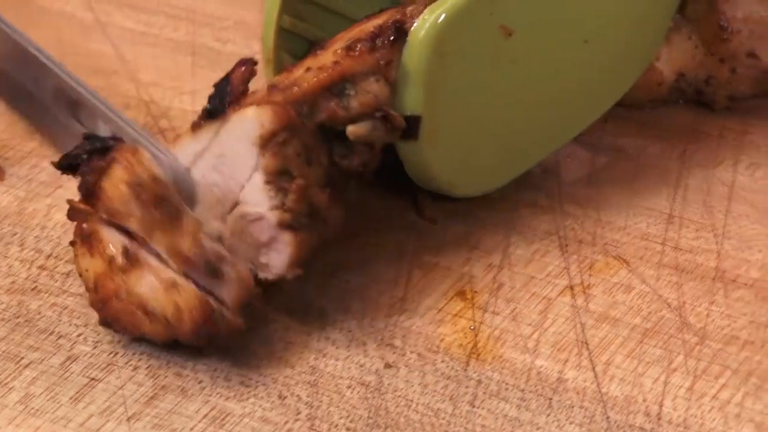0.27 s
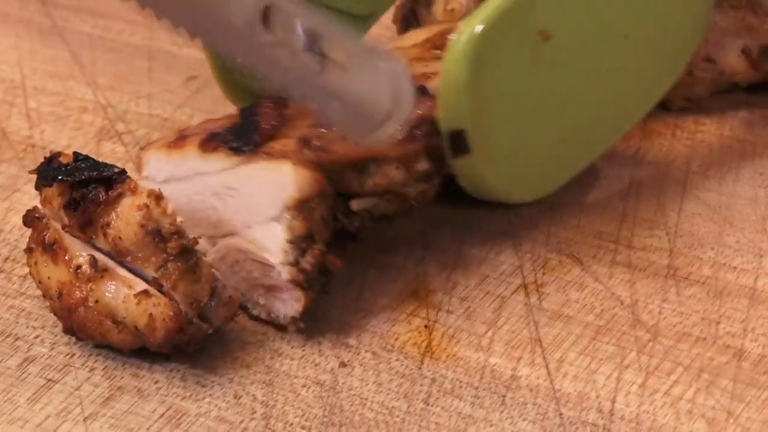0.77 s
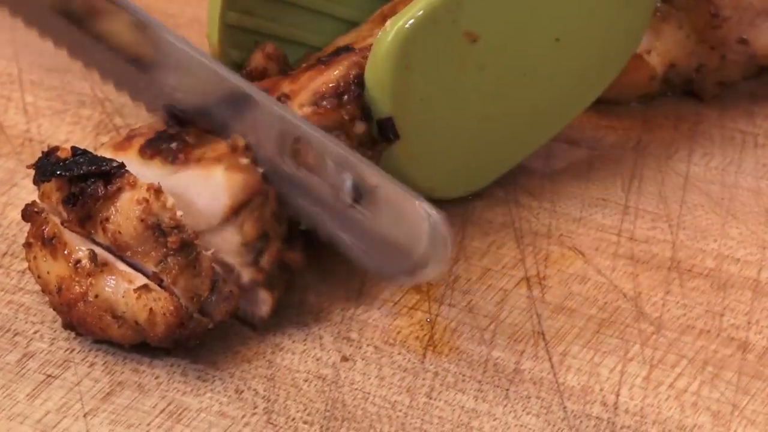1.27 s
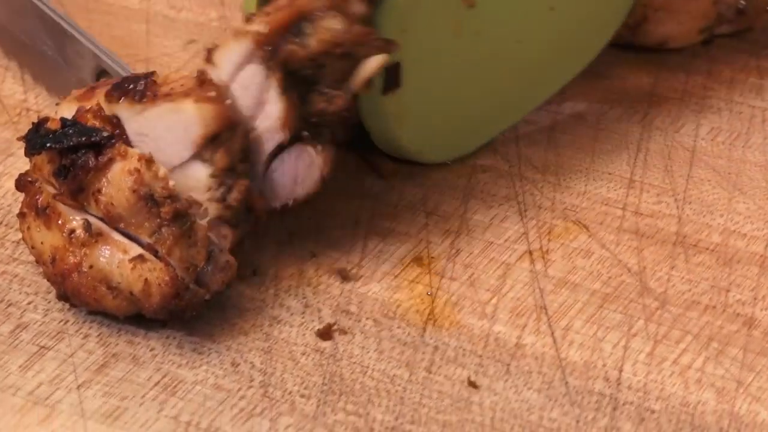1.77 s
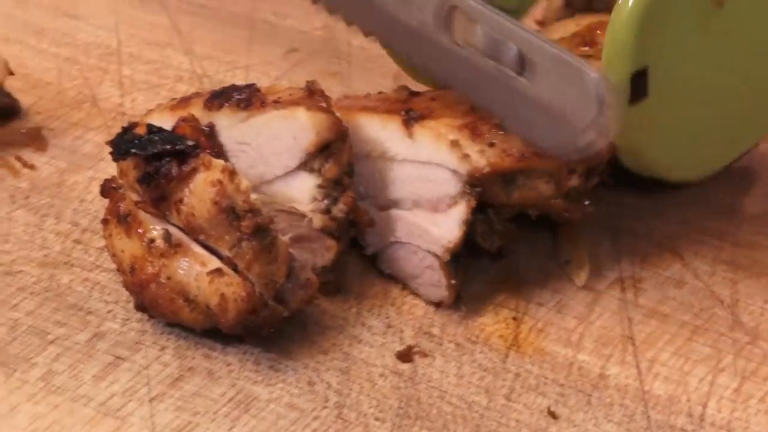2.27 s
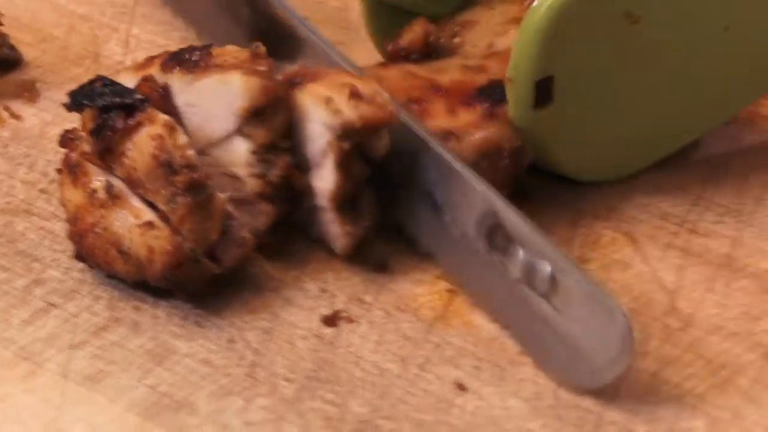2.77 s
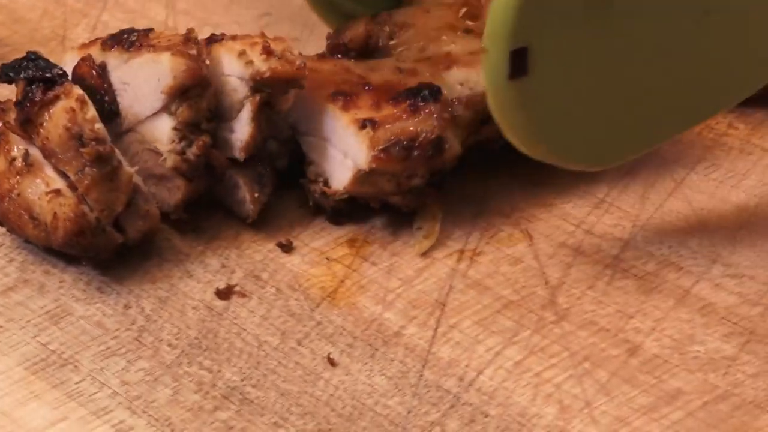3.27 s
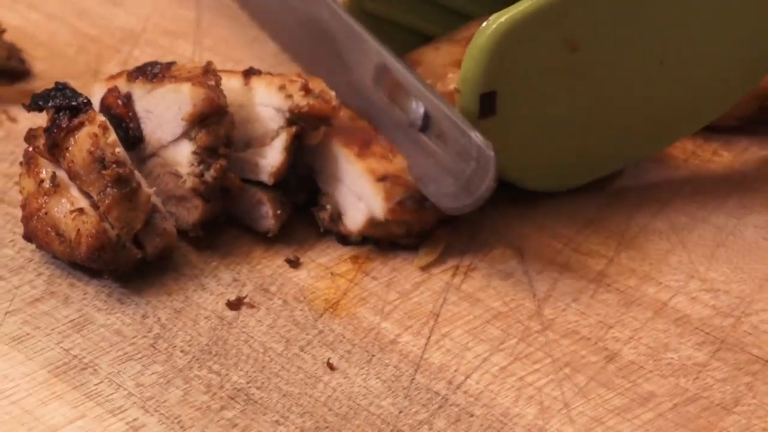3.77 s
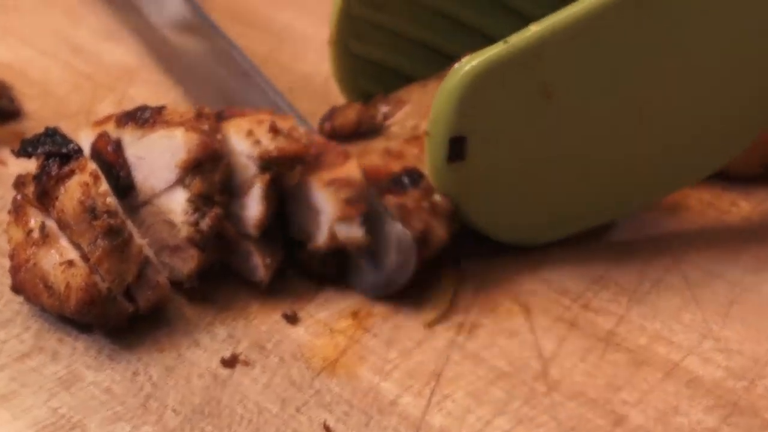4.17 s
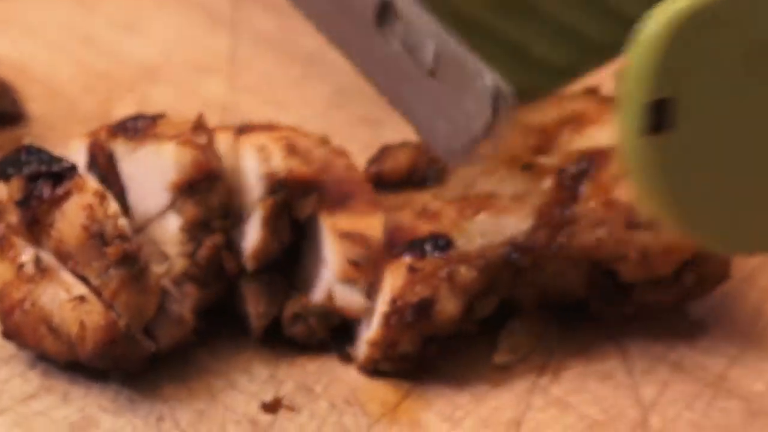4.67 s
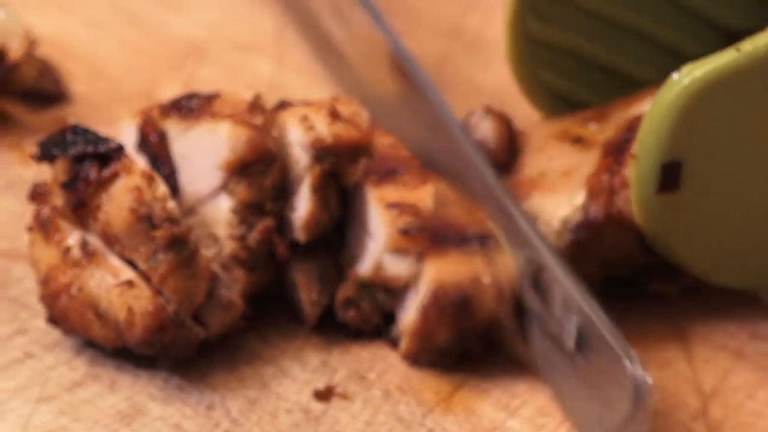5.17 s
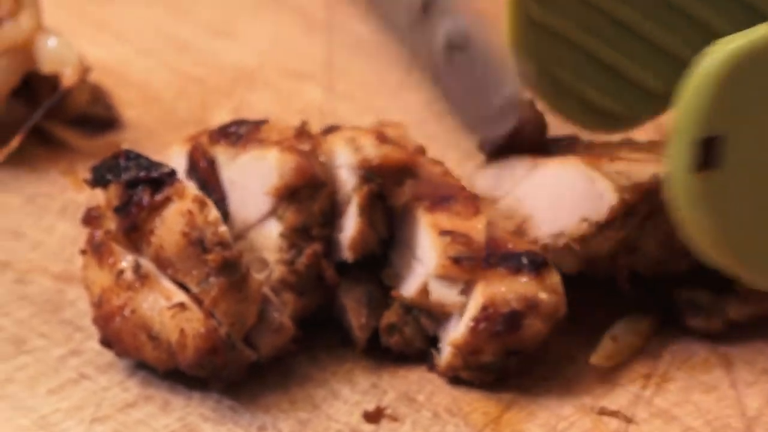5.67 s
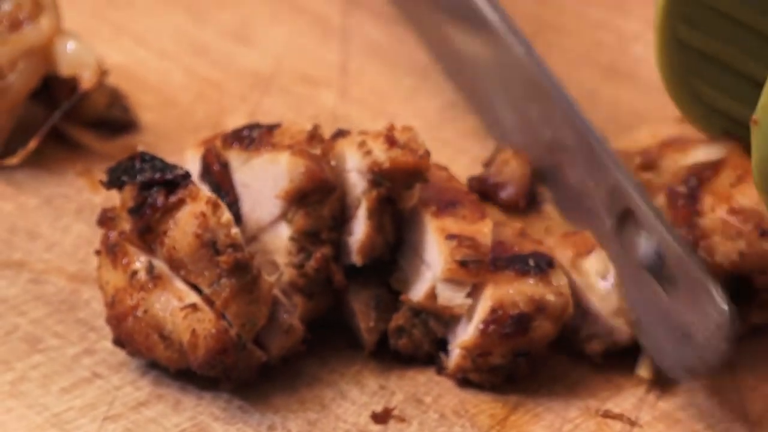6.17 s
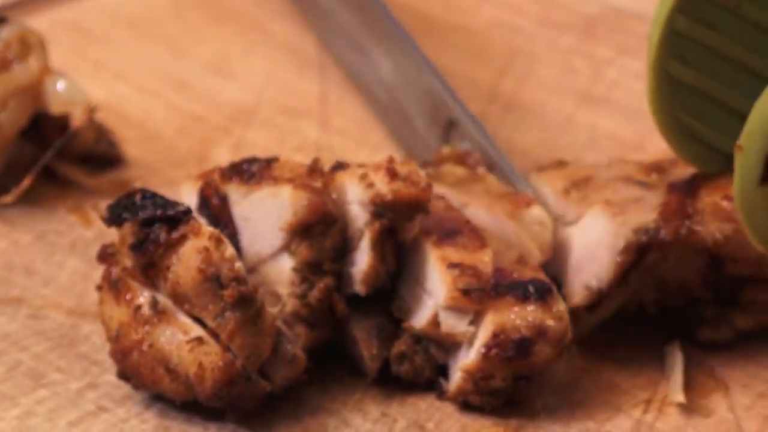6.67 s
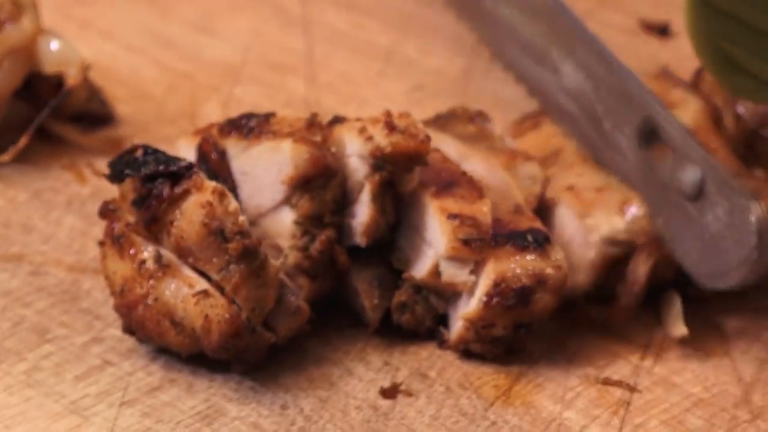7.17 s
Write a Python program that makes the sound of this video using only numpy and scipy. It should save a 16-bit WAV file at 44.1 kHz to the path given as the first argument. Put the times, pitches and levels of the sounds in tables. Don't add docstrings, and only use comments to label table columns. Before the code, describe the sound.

Close, dry, harsh motor buzz and metallic blade chatter, repeatedly sagging into a tighter, muffled whine as the knife bites into meat, then springing back.

```python
import sys
import numpy as np
from scipy import signal
from scipy.fft import rfft, irfft
from scipy.io import wavfile
from scipy.ndimage import uniform_filter1d

SR = 44100
rng = np.random.default_rng(int(sys.argv[2]) if len(sys.argv) > 2 else 0)


def invert_db(level):
    return 10 ** (np.asarray(level, dtype=float) / 20)


def int16_out(signal):
    q = np.round(np.clip(np.atleast_2d(signal).T, -1, 1) * 32767)
    wavfile.write(sys.argv[1], SR, q.astype(np.int16))


N = 327222

WHINE_PER_STROKE = np.array([21 / 2, 21, 84])
# (start [s], full [s], end [s], speed lost [strokes/s])
DRAG = [
    (-.594, .088, .361, 2.682),
    (.73, .732, .857, 11.191),
    (1.235, 1.727, 1.958, 3.062),
    (2.565, 3.115, 3.155, 3.57),
    (3.802, 4.054, 4.436, 2.79),
    (5.12, 5.512, 5.656, 3.425),
    (6.205, 6.76, 6.742, 4.891),
    (6.916, 8.904, 9, 2.476),
]
# (blades touch [s], sunk [s], come out [s], depth [0-1])
CUTS = [
    (-.4, -.2, .38, .8),
    (1.36, 1.48, 1.93, .76),
    (2.68, 2.92, 3.165, .8),
    (3.86, 3.98, 4.36, .8),
    (5.15, 5.24, 5.63, .52),
    (5.37, 5.47, 5.63, .42),
    (6.2, 6.52, 6.745, .86),
    (7.33, 7.55, 7.9, .9),
]
# (start [s], end [s], level on twice the rotor [dB])
STRAIN = [
    (-.1, .33, 2.5),
    (1.45, 1.93, 1),
    (2.8, 3.1, 2),
    (6.3, 6.75, 1),
]
# (start [s], end [s], level [dB])
COMMUTATOR = [(.2, .5, -49), (1.17, 1.65, -44), (1.68, 1.96, -46), (2.0, 2.2, -48), (2.2, 2.47, -44),
              (2.54, 2.97, -41.5), (3.12, 3.33, -47), (3.5, 3.75, -47), (3.84, 4.2, -41), (4.8, 5.1, -45),
              (4.95, 5.29, -40.5), (5.15, 5.52, -46), (5.95, 6.62, -41), (7.03, 7.5, -42)]
# (multiple of the stroke [1], level [dB])
HOUSING = [(13, -9), (14, -1.5), (15, -13), (16, -5.5), (18, -3.5), (20, -11), (23, -11), (26, -15),
           (27, -8), (28, -12), (29, -10), (31, -14), (34, -14)]
# (time [s], hum level [dB], more on high multiples [dB])
HOUSING_TURN = [(0, -3, -2), (.6, 0, 2), (1.0, -0.5, 3.5), (1.3, -1.5, 2.5), (1.95, -4, 3), (2.15, -1, 5),
                (2.45, -0.6, 1), (3.15, -7.5, -1), (3.4, 1, 3), (3.7, 0.5, -1), (4.4, -3, 2), (4.62, 2, -1),
                (4.85, 2, -2.5), (5.15, -4, -0.5), (5.8, -1, 1.5), (6.2, -4.5, 1), (6.9, -1.5, 0.5),
                (7.42, -3.5, 3.5)]
# (place in stroke [0-1], middle [dB], presence [dB], treble [dB], spray length [ratio])
FREE_CONTACTS = [(.245, -4.5, -1.5, 0, 1.1), (.42, -1, -.5, -.5, 1.4), (.735, -3.5, -5, -2.5, 1.2),
                 (.915, 0, -1.5, 0, 1.2)]
LOADED_CONTACTS = [(.18, 0, 0, 0, 1.1), (.44, -8, -9, -12, 3), (.695, -1, -4.5, -8, .9),
                   (.91, -10, -10, -6, 1.6)]
# (middle [dB], presence [dB], treble [dB])
FREE_BETWEEN = [-10, -13, -18]
# (frequency [Hz], density [dB per Hz])
FREE_COLOUR = [(15, -93), (25, -55), (50, -26.5), (175, -10.5), (426, -7), (474, -7), (528, -6), (621, -3),
               (1100, -4.5), (2210, -6), (2820, -9), (4000, -6), (6870, -6), (7860, -8.5), (12400, -10),
               (15900, -13.5)]
LOADED_COLOUR = [(15, -78), (25, -42.5), (403, -13.5), (462, -15), (771, -3.5), (907, -6), (1220, -8),
                 (1560, -7), (2980, -17.5), (3590, -7.5), (4110, -10.5), (6170, -10), (8080, -21.5),
                 (10000, -16.5), (15900, -23)]
# (frequency [Hz], width [Hz], level [dB])
FREE_PEAKS = [(850, 73, 5), (2690, 91, 1.5), (5400, 260, 2.5), (7840, 410, -9), (9600, 730, 0.5),
              (12600, 900, 1.2)]
LOADED_PEAKS = [(1328, 200, 5.6), (1960, 270, 6), (5570, 370, 0.93), (9340, 980, 4.6)]
# (start [s], end [s], level [dB])
TICKING = [
    (1.142, 1.46, 18),
    (2.55, 2.85, 15.5),
    (3.75, 3.95, 11),
    (5.05, 5.3, 15.5),
    (6.1, 6.35, 18),
    (7.22, 7.5, 7),
]
BAND_EDGES = [450, 4400, 7600]
# (level [dB], share of swing [1], share of brightness [1], lost in meat [dB])
BASS = (-17, .4, 0, 11.5)
PRESENCE = (0.0, 1.5, 1, 3.5)
TREBLE = (-2.5, 0, 0.06, 9)
# (time [s], loudness [dB], brightness toward the microphone [dB])
SWING = [(0.0, -32.5, -5), (.3, -33, -3.5), (.47, -30.5, -4), (.75, -29.5, -3), (1.05, -30, -3),
         (1.8, -32.5, -2), (2.27, -29, -2), (2.7, -31, -4.5), (3.1, -32, -2), (3.55, -29.5, -3),
         (4.3, -32, -3), (4.9, -29.5, -1.5), (5.3, -30, -3), (5.57, -32.5, -1.5), (6.05, -28.5, -3.5),
         (6.68, -31.5, -3.5), (7.1, -28.5, -5), (7.42, -32, -2)]
# (start [s], end [s], bass gained [dB])
BOARD = [(.11, .15, 9), (1.62, 1.73, 9), (2.76, 2.84, 6), (3.0, 3.07, 8), (4.0, 4.13, 7), (4.2, 4.27, 8),
         (5.34, 5.42, 4), (5.5, 5.56, 4), (6.25, 6.3, 4), (6.41, 6.47, 6), (6.59, 6.68, 8)]
# (start [s], end [s])
SNAGS = [
    (2.84, 2.97),
    (5.36, 5.46),
]
# (time [s], lower centre [Hz], upper centre [Hz])
BLADE_RINGS = [(0.0, 2800, 5760), (0.39, 2830, 5400), (0.54, 2580, 5960), (0.87, 3160, 6350),
               (1.3, 2740, 6430), (1.9, 2800, 5370), (2.15, 2500, 5860), (2.33, 2960, 6240),
               (2.89, 2550, 5860), (3.06, 2880, 5300), (3.5, 3180, 5600), (4.1, 2480, 5840),
               (4.56, 2690, 5850), (4.9, 3200, 5030), (5.19, 2440, 5770), (6.08, 3080, 5470),
               (6.57, 2500, 5670), (7.17, 3350, 5360)]
# (frequency [Hz], width [Hz], level [dB])
LOWER_MODES = [(2500, 200, 2.5), (2770, 180, 6), (2980, 180, 4), (3500, 220, 3)]
UPPER_MODES = [(5030, 230, 1), (5700, 320, -1.5), (6140, 1300, 6.5), (6830, 460, 17)]
TOP_MODES = [(9700, 240, -13), (8660, 440, -9)]
# (start [s], end [s], frequency [Hz], width [Hz], level [dB])
FACING = [(.36, 0.76, 9700, 500, -4.5), (1.07, 1.43, 9700, 340, -4), (1.93, 2.3, 9800, 500, -2),
          (2.4, 2.83, 9400, 450, -4), (3.3, 3.75, 9800, 500, -7), (4.38, 4.7, 9600, 500, -5.5),
          (4.95, 5.24, 10000, 450, -0.5), (5.62, 6.1, 9900, 500, -5), (6.72, 6.85, 9500, 500, -2),
          (7.1, 7.5, 9800, 450, 0), (3.15, 3.8, 8800, 680, -9), (5.62, 6.3, 9700, 540, -11),
          (.45, 0.87, 12100, 780, -8), (1.42, 1.6, 12300, 900, -3), (1.75, 2.5, 12300, 770, -4),
          (3.1, 3.85, 12600, 1800, -9), (4.3, 4.8, 12300, 900, -8), (4.6, 5.2, 13000, 1700, -7),
          (5.65, 6.4, 12200, 900, -7), (6.75, 7.5, 12600, 900, -5), (1.2, 1.58, 2700, 210, -8.5),
          (7.27, 7.42, 2640, 270, 5), (7.19, 7.9, 2050, 220, 1), (6.78, 6.98, 5750, 260, -3),
          (0.35, 0.52, 800, 90, 1), (1.57, 1.8, 1700, 160, -6), (7.1, 7.21, 3550, 160, 5),
          (4.05, 4.42, 5900, 950, -6), (4.6, 5.6, 1290, 83, -7), (5.05, 5.35, 2100, 380, -7),
          (6.68, 7.08, 2800, 120, -5), (3.55, 3.8, 5200, 420, -4), (4.0, 4.3, 10400, 1200, -17),
          (0.63, 1, 730, 200, -4), (3.62, 3.96, 2750, 120, -5.5), (3.42, 3.72, 3660, 180, -5),
          (3.2, 3.46, 2460, 140, 1), (2.62, 2.9, 5900, 360, -9), (3.8, 4.05, 5800, 360, -2)]


def in_time(rows):
    s, *columns = np.transpose(rows)
    return [np.interp(np.arange(N) / SR, s, c) for c in columns]


def plateau(start, rise, end, fall):
    t = np.arange(N) / SR
    return np.clip((t - start) / rise, 0, 1) * np.clip((end - t) / fall + .5, 0, 1)


def drift(rate_hz):
    r = np.exp(-200 * np.pi * rate_hz / SR)
    noise = rng.standard_normal(N // 100 + 502)
    slow = signal.lfilter([1], [1, -2 * r, r * r], noise)[500:]
    return np.interp(np.arange(N) / 100, np.arange(len(slow)), slow / slow.std())


def evened(x, span_s=0.27):
    return x / np.sqrt(uniform_filter1d(x ** 2, int(span_s * SR)) + 1e-12)


def passband(x, low_hz, high_hz, order=3):
    for edge_hz, kind in [(low_hz, "high"), (high_hz, "low")]:
        if edge_hz:
            x = signal.sosfilt(signal.butter(order, edge_hz, kind, fs=SR, output="sos"), x)
    return x


def resonance(x, hz, width_hz):
    r = np.exp(-np.pi * width_hz / SR)
    poles = [1, -2 * r * np.cos(2 * np.pi * hz / SR), r * r]
    return signal.lfilter([1, 0, -1], poles, x) * (1 - r * r) / 2


def coloured(x, colour, peaks):
    size = 8192
    hz = np.maximum(np.arange(size // 2 + 1) * SR / size, 1)
    colour_hz, colour_db = np.transpose(colour)
    level_db = np.interp(np.log(hz), np.log(colour_hz), colour_db)
    for centre, width, db in peaks:
        level_db = level_db + db / (1 + (2 * (hz - centre) / width) ** 2)
    cepstrum = irfft(np.log(invert_db(np.maximum(level_db, -90))))
    cepstrum[1:size // 2] *= 2
    cepstrum[size // 2 + 1:] = 0
    return signal.fftconvolve(x, irfft(np.exp(rfft(cepstrum))))[:N]


def blade_load():
    free_load, come_out_s = .08, .08
    sunk = sum((depth - free_load) * plateau(touch, deep - touch, out, come_out_s)
               for touch, deep, out, depth in CUTS)
    return np.clip(free_load + sunk, 0, 1)


def stroke_rate():
    start_per_s, warm_per_s, cold_loss_per_s = 40.435, 46.958, 3.472
    warm_up_s, rotor_lag_s, drag_fade_s = 4.93, .23, .178
    free = warm_per_s - cold_loss_per_s * np.exp(-np.arange(N) / SR / warm_up_s)
    drag = sum(lost * plateau(start, full - start, end, drag_fade_s) for start, full, end, lost in DRAG)
    keep = np.exp(-1 / (rotor_lag_s * SR))
    return start_per_s + signal.lfilter([1 - keep], [1, -keep], free - drag - start_per_s)


def motor(turns, faster, load):
    rotor_db = -53.5 + 2.0 * faster + 2.0 * drift(2.2)
    straining = np.clip((load - .35) / .4, 0, 1)
    twice_db = -57 + .7 * faster + 13.5 * straining + .7 * drift(3.3)
    twice_db = twice_db + sum(db * plateau(start, .06, end, .1) for start, end, db in STRAIN)
    hidden_db, turn_in_s, turn_out_s = -58, .18, .05
    shown_db = np.max([(db - hidden_db) * plateau(start, turn_in_s, end, turn_out_s)
                       for start, end, db in COMMUTATOR], axis=0)
    commutator_db = hidden_db + drift(4.3) + shown_db
    tremble = 1 + .2 * np.sin(2 * np.pi * turns)
    return tremble * sum(np.sqrt(2) * invert_db(level_db) * np.sin(2 * np.pi * k * turns)
                         for k, level_db in zip(WHINE_PER_STROKE, (rotor_db, twice_db, commutator_db)))


def housing_hum(turns, speed, faster, load):
    reversal, strongest = .505, 14
    since_reversal = 2 * np.pi * (turns - reversal)
    waver = .15 + .8 * np.maximum(43.2 - speed, 0)
    turn_db, upper_db = in_time(HOUSING_TURN)
    hum = 0
    for k, level_db in HOUSING:
        multiple_db = level_db + upper_db * (k > strongest) + drift(6)
        hum = hum + invert_db(multiple_db) * np.cos(k * since_reversal + waver * drift(7))
    return np.sqrt(2) * invert_db(-39.3 + turn_db + 2.0 * faster - 24 * load) * hum


def once_a_stroke(turns, place, jitter_ms, spread_db):
    marks = np.arange(int(turns[-1])) + place
    early, strength = rng.standard_normal((len(marks), 2)).T
    at = np.interp(marks, turns, np.arange(N)) + early * jitter_ms * SR / 1000
    clicks = np.zeros(N)
    clicks[np.clip(at.astype(int), 0, N - 1)] = invert_db(spread_db * strength)
    return clicks


def chatter(turns, contacts, dying_ms, between_db, jitter_ms, spread_db, grain_db):
    trains = [once_a_stroke(turns, place, jitter_ms, spread_db) for place, *levels in contacts]
    grain_sizes = invert_db(grain_db * np.minimum(rng.exponential(1, N), 4))
    keep = np.exp(-1000 / (np.array(dying_ms) * SR))
    drives = []
    for band in range(3):
        spray = 0
        for (place, *levels, length), train in zip(contacts, trains):
            decay = [1, -keep[band] ** (1 / length)]
            spray = spray + signal.lfilter([invert_db(2 * levels[band])], decay, train ** 2 + 1e-18)
        spray = uniform_filter1d(spray, size=12)
        power = spray + invert_db(2 * between_db[band])
        drives.append(rng.standard_normal(N) * grain_sizes * np.sqrt(power))
    return np.array(drives), trains


def free_blades(turns):
    at_large_db, tightens, tick_ms = 11, .9, 1.2
    ticking_db = sum((db - at_large_db) * plateau(start, 0.13, end, 0.041) for start, end, db in TICKING)
    between_db = [db - tightens * ticking_db for db in FREE_BETWEEN]
    drives, trains = chatter(turns, FREE_CONTACTS, [1.4, 1.9, 1.4], between_db,
                             jitter_ms=.12, spread_db=.9, grain_db=.3)
    tick = invert_db(at_large_db + ticking_db) * (trains[1] + trains[3] + invert_db(-19) * trains[0])
    shape = rng.standard_normal(300) * np.exp(-np.arange(300) / (tick_ms * SR / 1000))
    tick = signal.fftconvolve(tick, shape / np.linalg.norm(shape))[:N]
    tick = passband(tick, 1700, None, order=2)
    shove = invert_db(27.0) * (trains[0] + trains[1] + trains[3]) * rng.standard_normal(N)
    ranges = [drives[0] + shove, *(drives + tick)]
    return [coloured(drive, FREE_COLOUR, FREE_PEAKS) for drive in ranges]


def loaded_blades(turns):
    drives, trains = chatter(turns, LOADED_CONTACTS, [1.6, 1.7, 1.3], [-9, -15, -21],
                             jitter_ms=.04, spread_db=1.1, grain_db=.8)
    shape = rng.standard_normal(900) * np.exp(-np.arange(900) / (5.0 * SR / 1000))
    click = signal.fftconvolve(trains[0] + trains[2] / 2, shape)[:N]
    click = invert_db(1.5) * passband(click, 1040, None, order=2)
    shove = invert_db(36 + 3.5 * rng.standard_normal(N)) * trains[0]
    ranges = [drives[0] + shove, drives[0] + click, drives[1] + 3.7 * click, drives[2]]
    return [coloured(drive, LOADED_COLOUR, LOADED_PEAKS) for drive in ranges]


def moving_ring(x, modes, centre_hz, reach_hz):
    out = x.copy()
    for hz, width_hz, level_db in modes:
        rung = resonance(x, hz, width_hz)
        nearness = np.exp(-((centre_hz - hz) / reach_hz) ** 2)
        out += invert_db(level_db + drift(7.0)) * nearness * rung
    return out


def facing(x):
    ramp_s = 0.066
    out = x.copy()
    for start, end, hz, width_hz, level_db in FACING:
        span = slice(int(max(start - .02, 0) * SR), int((end + ramp_s) * SR))
        swell = plateau(start, ramp_s, end, ramp_s)[span]
        out[span] += invert_db(level_db) * swell * resonance(x[span], hz, width_hz)
    return out


def rattle(turns, load):
    middle_db, bright_db = in_time(SWING)
    usual_db = middle_db.mean()
    bass_db, presence_db, treble_db = [
        usual_db + db + share * (middle_db - usual_db) + turned * bright_db - lost_db * load
        for db, share, turned, lost_db in (BASS, PRESENCE, TREBLE)]
    bass_db = bass_db + sum(db * plateau(start, 0.011, end, 0.006) for start, end, db in BOARD)
    snag_db = 2.5 * sum(plateau(start, 0.05, end, 0.05) for start, end in SNAGS)
    middle_db = middle_db - 2.5 * load + snag_db

    grips = [np.clip(1.22 * load, 0, 1), load, load, load]
    edges_hz = [None, *BAND_EDGES, None]
    ranges = []
    for grip, free, held, low, high in zip(grips, free_blades(turns), loaded_blades(turns),
                                           edges_hz, edges_hz[1:]):
        loose = np.sqrt(1 - grip) * evened(passband(free, low, high))
        gripped = np.sqrt(grip) * evened(passband(held, low, high))
        ranges.append(loose + gripped)
    bass, middle, presence, treble = ranges

    lower_hz, upper_hz = in_time(BLADE_RINGS)
    middle = evened(moving_ring(middle, LOWER_MODES, lower_hz, reach_hz=500))
    presence = evened(moving_ring(presence, UPPER_MODES, upper_hz, reach_hz=710))
    treble = evened(moving_ring(treble, TOP_MODES, 1.6 * upper_hz, reach_hz=600))
    return facing(invert_db(middle_db) * middle + invert_db(bass_db) * bass
                  + invert_db(presence_db) * presence + invert_db(treble_db) * treble)


def scene():
    speed, load = stroke_rate(), blade_load()
    turns = np.cumsum(speed) / SR
    faster = speed - 45.0
    mix = motor(turns, faster, load) + housing_hum(turns, speed, faster, load) + rattle(turns, load)
    return mix[None]


def roll_off(x):
    return signal.sosfilt(signal.butter(12, 15830, fs=SR, output="sos"), x)


def record(dry):
    rounded = .3 * np.tanh(dry / .3)
    top_cut = signal.ellip(10, .3, 60, 15850, fs=SR, output="sos")
    finished = signal.sosfilt(top_cut, rounded)
    return roll_off(finished)


dry = scene()
out = record(dry)
int16_out(out)
```